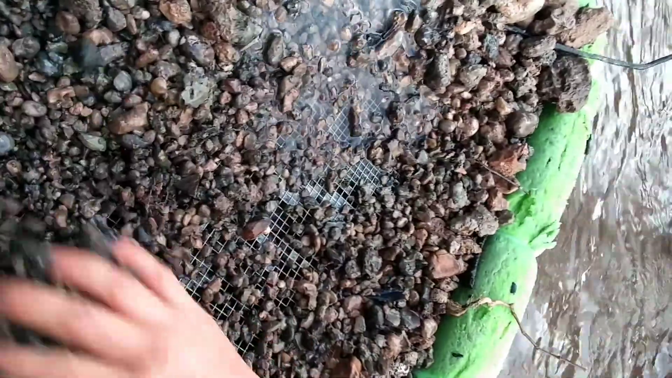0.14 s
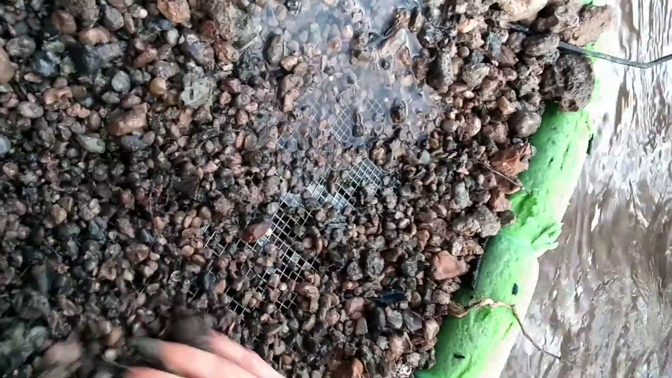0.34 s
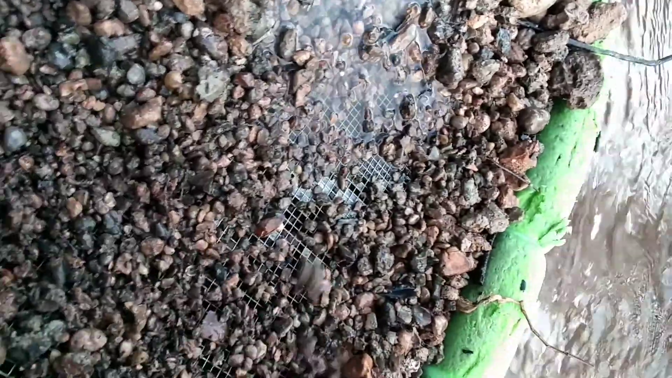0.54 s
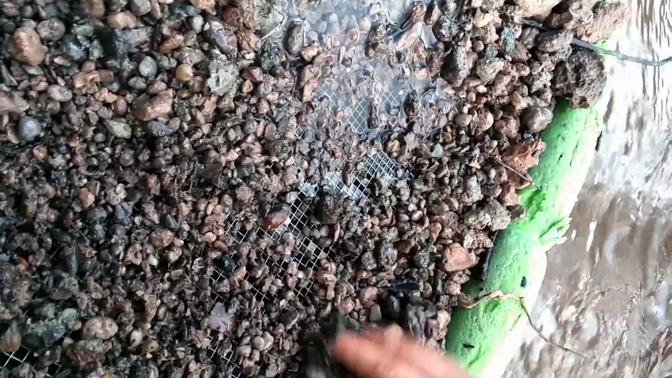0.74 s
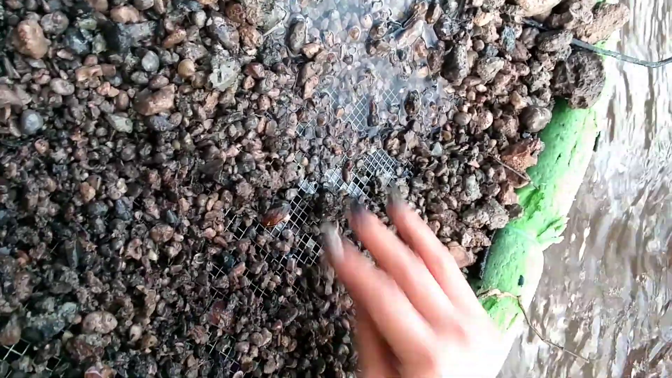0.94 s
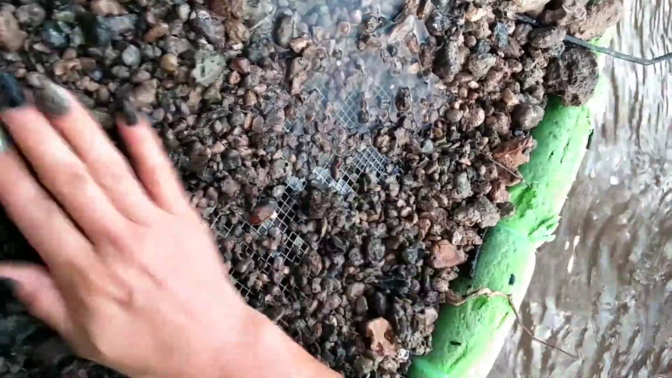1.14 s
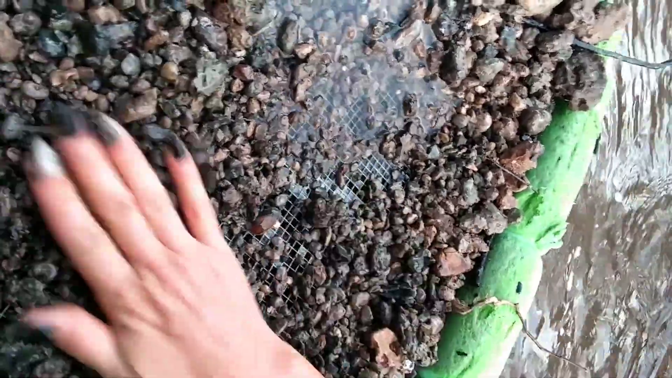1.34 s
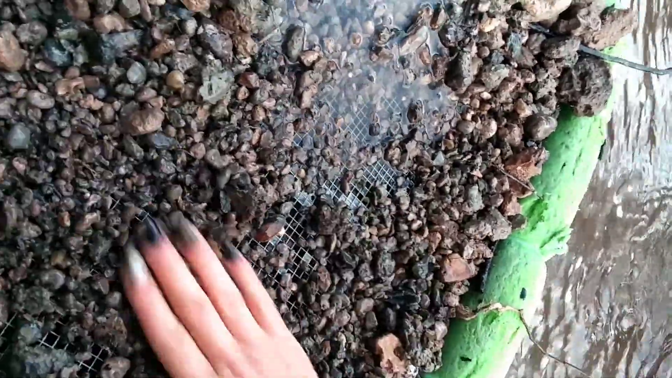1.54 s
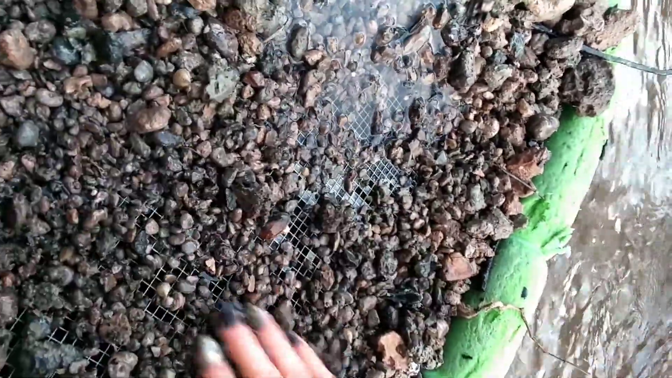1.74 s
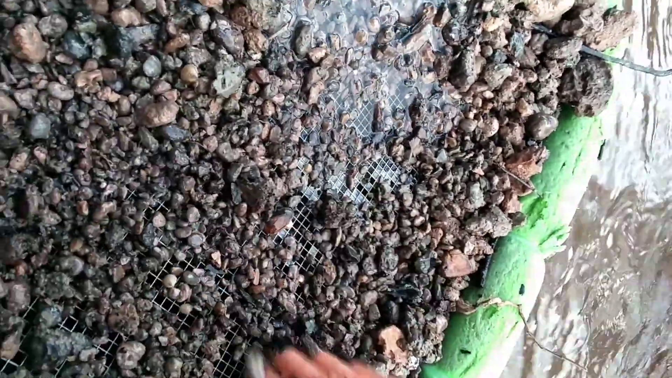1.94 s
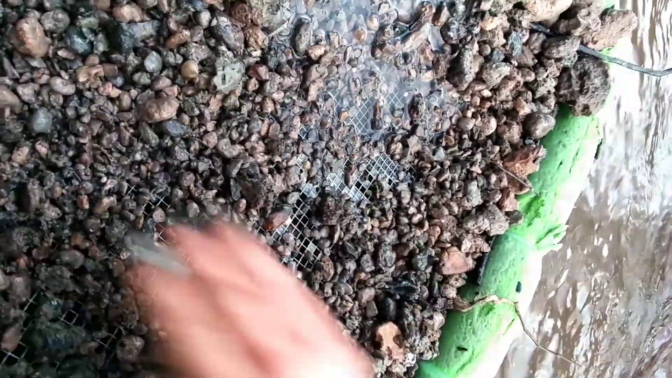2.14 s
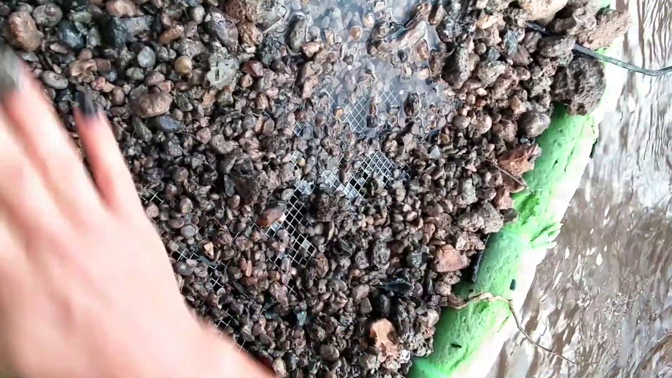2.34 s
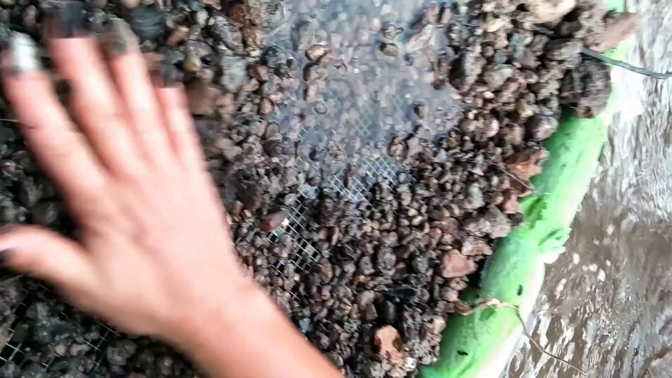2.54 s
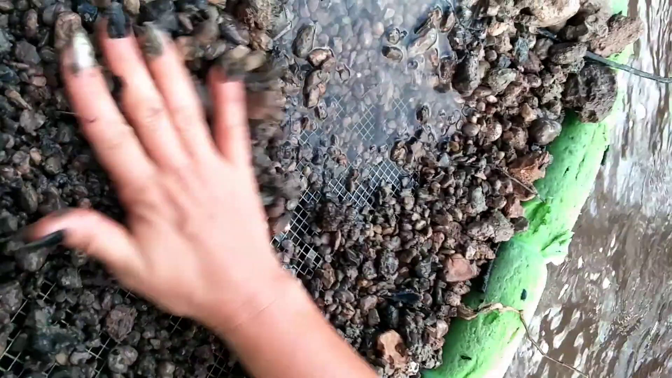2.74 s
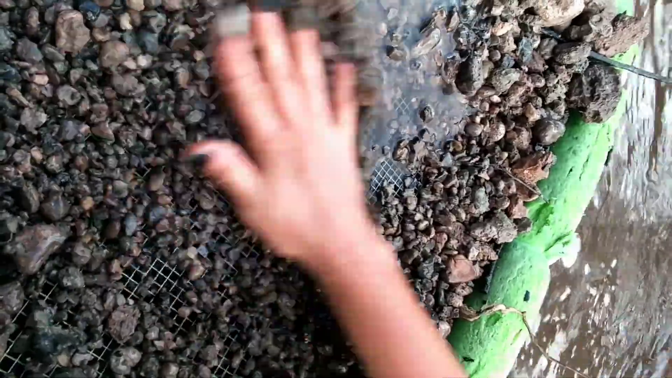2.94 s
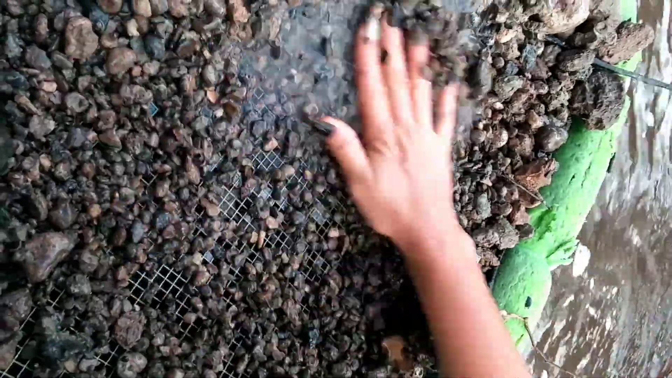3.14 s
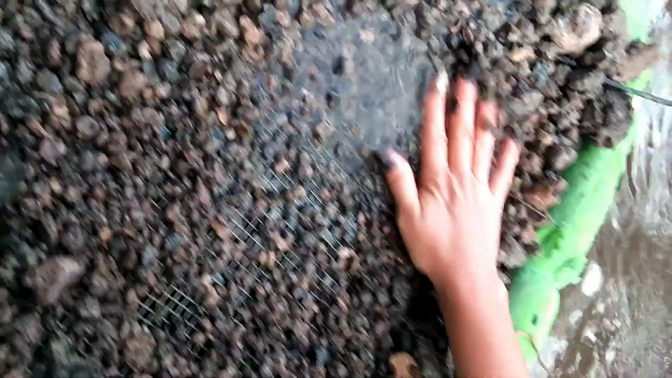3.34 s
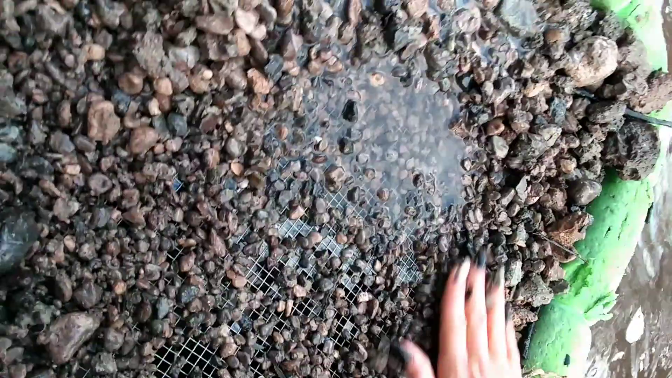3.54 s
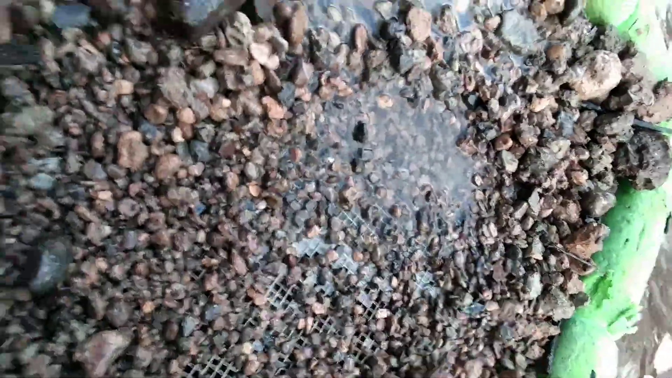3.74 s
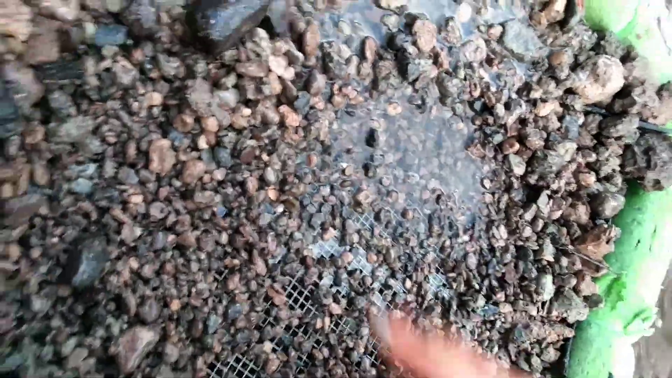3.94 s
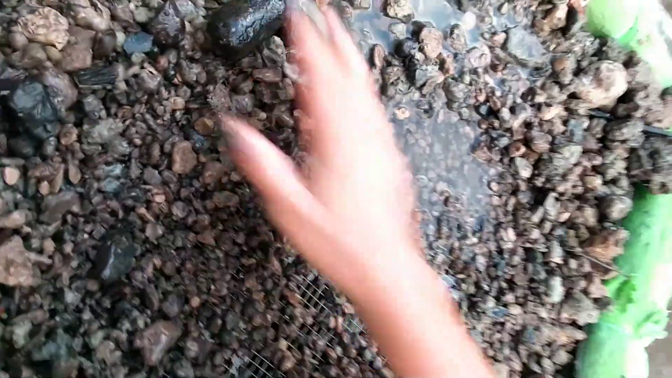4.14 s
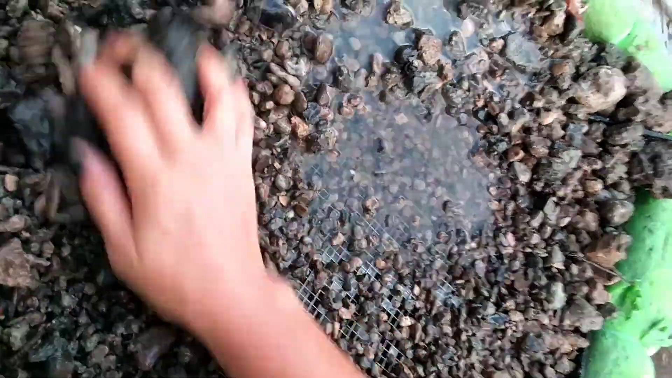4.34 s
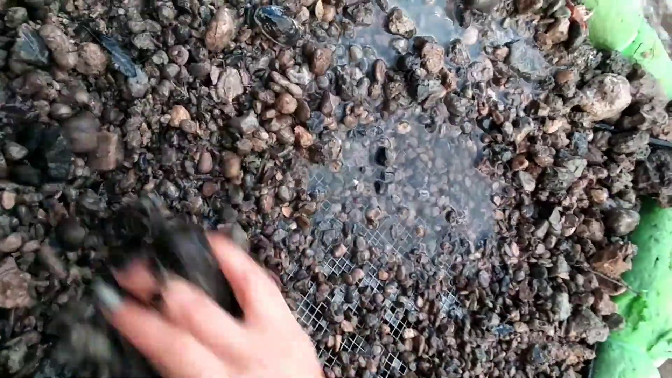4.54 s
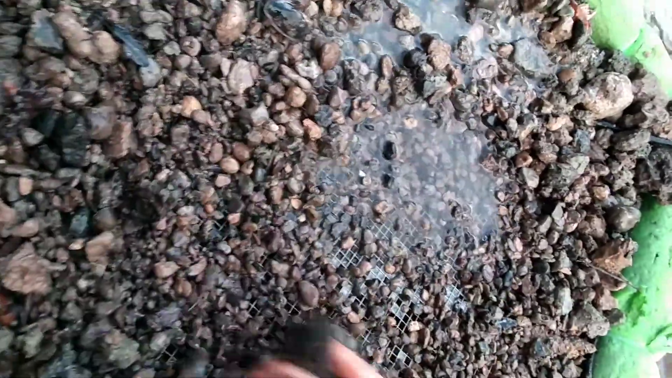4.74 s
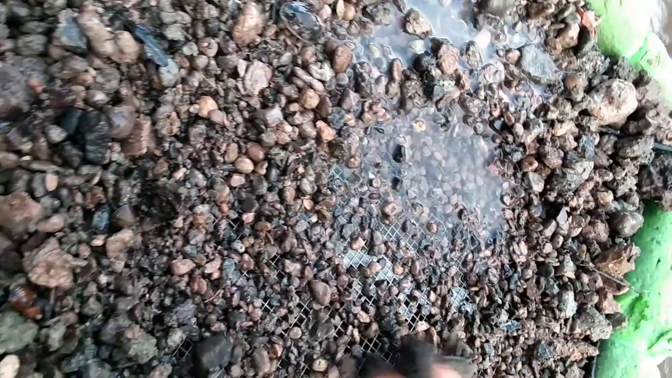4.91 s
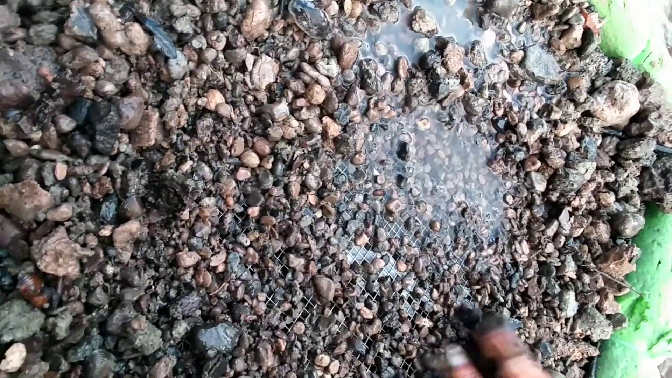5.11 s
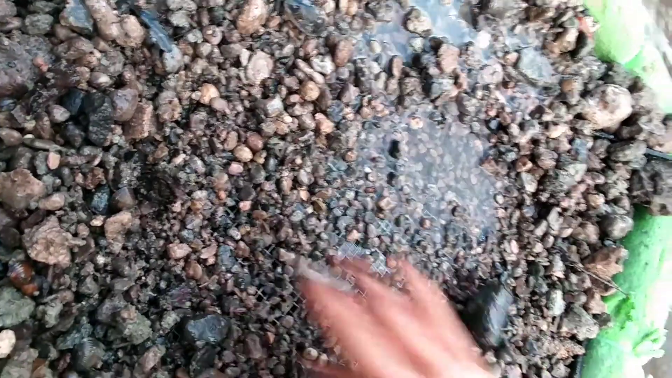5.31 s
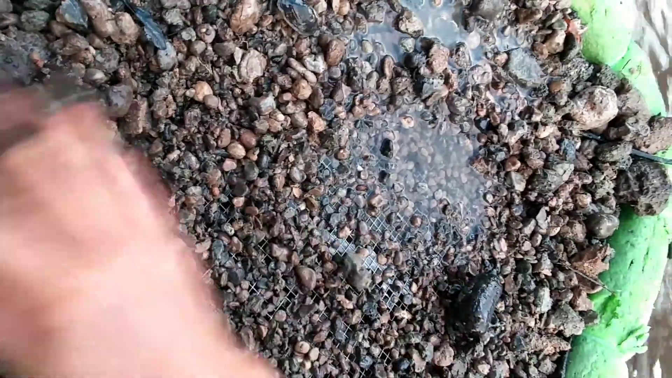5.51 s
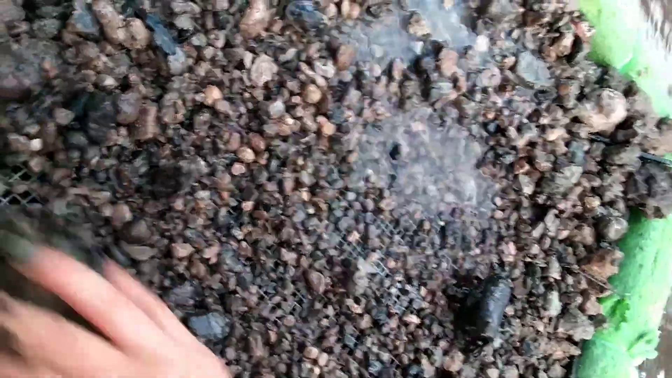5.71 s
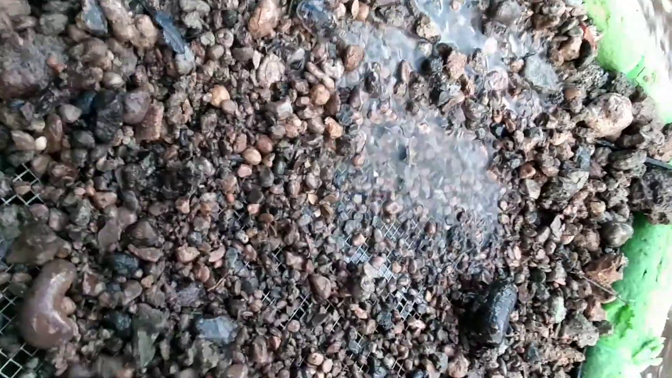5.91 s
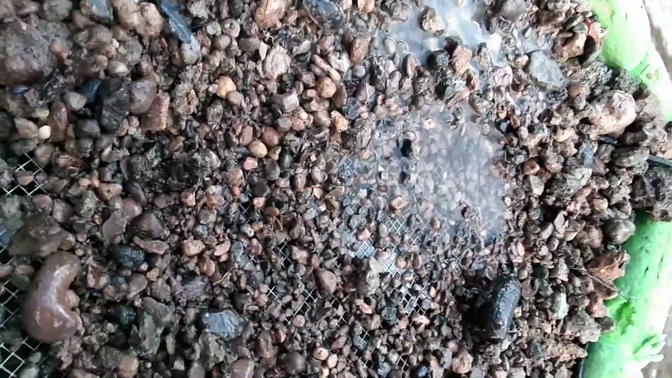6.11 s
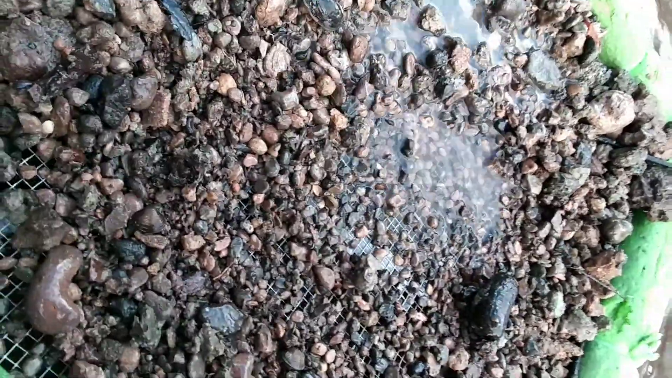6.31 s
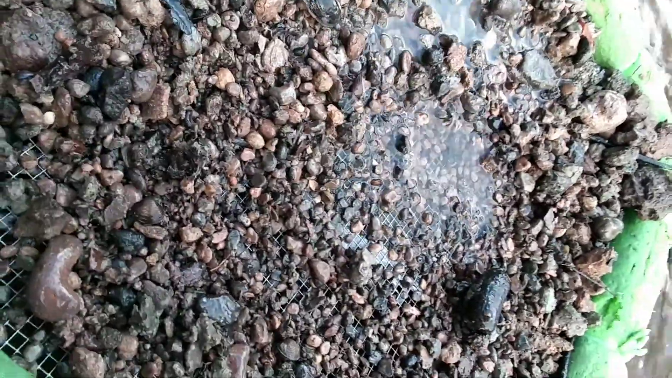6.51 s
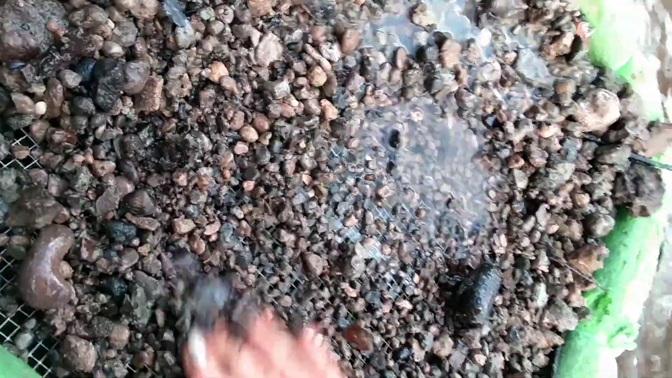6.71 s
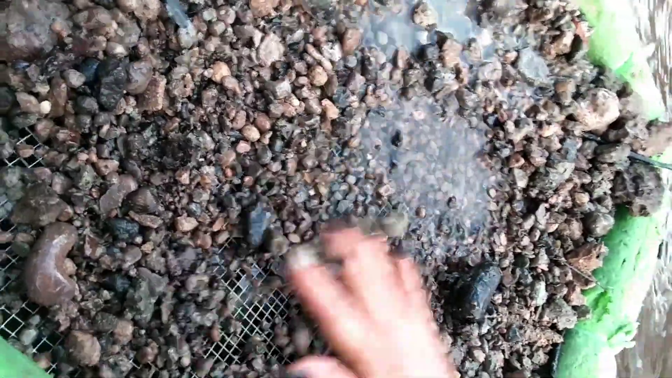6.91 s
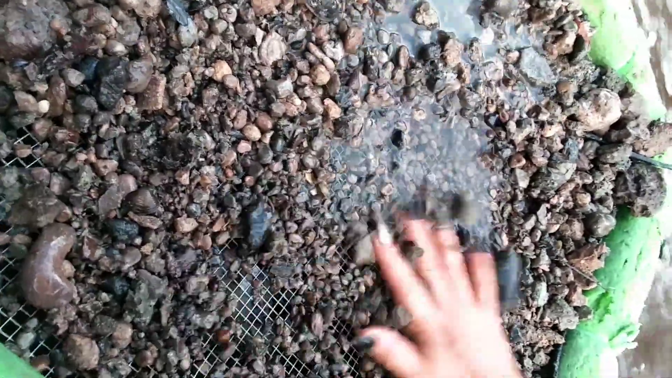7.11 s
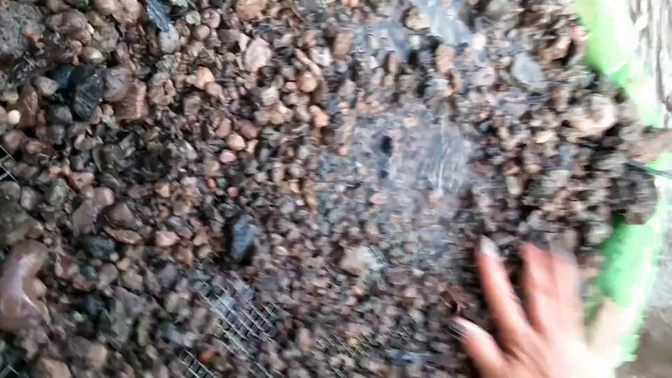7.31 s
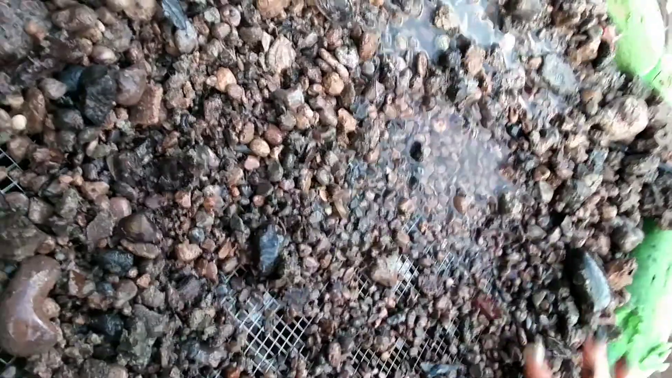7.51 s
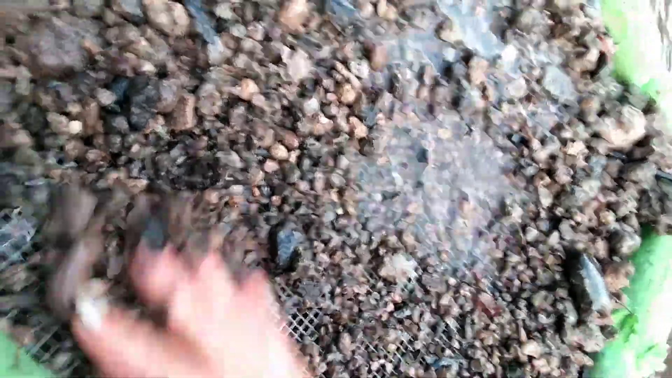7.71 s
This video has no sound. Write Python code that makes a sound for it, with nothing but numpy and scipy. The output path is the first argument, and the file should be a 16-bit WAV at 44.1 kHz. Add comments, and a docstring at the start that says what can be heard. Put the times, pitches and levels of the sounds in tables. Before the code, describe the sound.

A hand rakes wet gravel across a wire-mesh screen in short scraping strokes, with pebble clicks, stone knocks and faint lapping water behind.

```python
"""A hand rakes wet gravel over a wire-mesh screen in short strokes, close to a small stereo microphone.
The gravel is showers of damped rings and bursts of noise, driven by the push of the hand in jolts.
Skidding stones are swells of narrow noise, clicking pebbles are noise cracks, and heavy stones knock
the screen with a decaying tone and a thud. Behind it, filtered noise laps and trickles faintly as water,
and two wavering sines make the low hum of a far motor, with low booming at the start and end."""
import sys
import numpy as np
from scipy import signal
from scipy.fft import rfft, irfft, next_fast_len
from scipy.io import wavfile
from scipy.ndimage import uniform_filter1d, map_coordinates

SR = 44100
rng = np.random.default_rng(int(sys.argv[2]) if len(sys.argv) > 2 else 0)


def unload_wav(signal):
    """Save mono or channel-first audio to the path in sys.argv[1] as 16-bit WAV at rate SR, clipped to [-1, 1]."""
    wavfile.write(
        sys.argv[1],
        SR,
        np.round(np.clip(np.atleast_2d(signal).T, -1, 1) * 32767).astype(np.int16),
    )


N = 342216
TIME = np.arange(N) / SR
TOP_HZ = 15950  # upper band limit


def amp(db):
    """Decibels to gain."""
    return 10 ** (np.asarray(db) / 20)


def unit(x):
    """Scale to rms 1."""
    return x / np.sqrt(np.mean(x ** 2) + 1e-20)


def curves(rows):
    """One value per sample for each column after the time."""
    s, *cols = np.transpose(rows)
    return [np.interp(TIME, s, c) for c in cols]


def wobble(rate):
    """A smooth random curve, rate knots a second."""
    knots = rng.standard_normal(int(N * rate / SR) + 4)
    return map_coordinates(knots, [TIME * rate])


def colour(x, points, power=1):
    """Causal minimum-phase filter through (Hz, dB) points on a log axis; power scales the dB."""
    m = 2 * next_fast_len(N // 2 + 8192)
    hz, db = np.transpose(points)
    log_hz = np.log(np.fft.rfftfreq(m, 1 / SR) + 1)
    log_gain = np.log(amp(np.interp(log_hz, np.log(hz), db)))
    cepstrum = irfft(power * log_gain, m)
    # fold the cepstrum forward in time
    cepstrum[1:m // 2] *= 2
    cepstrum[m // 2 + 1:] = 0
    return irfft(rfft(x, m) * np.exp(rfft(cepstrum)), m)[..., :N]


def add(track, s, sound):
    """Mix a stereo sound into the track at time s."""
    part = track[:, max(round(s * SR), 0):][:, :sound.shape[1]]
    part += sound[:, :part.shape[1]]


def noise_band(low_hz, high_hz, shape):
    """White noise through a gentle band-pass."""
    b, a = signal.butter(2, [low_hz, high_hz], "band", fs=SR)
    return signal.lfilter(b, a, rng.standard_normal(shape))


# Tone of each gravel layer, and of the loaded mesh as a drumhead (boom).
# Each row: frequency in Hz, relative level in dB.
SAND_TONE = [(3000, -16.5), (7000, -3.5), (11000, 4), (16000, 6)]
GRIT_TONE = [(1200, -45.5), (3000, -9.5), (4800, -2), (8000, -0.5), (11000, -4.5), (16000, -8)]
PEBBLE_TONE = [(900, -31), (1800, -10.5), (2700, -4.5), (4200, -2), (6000, 3), (10000, -32)]
STONE_TONE = [(400, -32.5), (800, -7.5), (1150, 0), (1500, -1), (1900, -1), (2800, -13), (5000, -33)]
SCREEN_TONE = [(40, -26), (90, -0.5), (160, -2), (300, -6), (620, 2), (850, 1), (1400, -1), (3000, -41)]
BOOM_TONE = [(30, -25.5), (55, -13), (82, 3.5), (110, -10.5), (170, -10), (300, -29.5)]
UNEVEN_DB, UNEVEN_RATE = 1.0, 28  # unevenness of the drag: depth, changes per s
SNAP_RATE, SNAP_LIFE_S, SNAP_SCATTER_DB = 45, .00028, 3.5  # snaps per s at busy = 1, decay, spread of level


def raking():
    """The harder the push, the more stones move at once; small ones ring high, big ones low, and the
    screen rumbles."""
    push, on_sand, on_pebbles, on_stones, on_screen = effort()
    busy = np.clip(push / amp(-24), .03, 3) ** .6

    # a full push slides smoothly; a dying one breaks up into separate ticks
    slip = jolts(190 * np.sqrt(busy), life=0.004, scatter_db=0.8, smooth=1.1 * np.sqrt(busy))

    # sand scratches along the wires in tiny bursts
    scratch = jolts(900 * busy, life=0.00064, scatter_db=2.0, smooth=.5)
    sand = on_sand * unit(colour(scratch * rng.standard_normal((2, N)), SAND_TONE))

    grit = impacts(8000 * busy, hz=6640, spread=.35, cycles=1.7, scatter_db=0.0, width_s=.00008, size=96)
    grit = push * amp(-1.5) * patchy(colour(grit, GRIT_TONE), depth_db=2.0)

    pebbles = impacts(3500 * busy, hz=3122, spread=.35, cycles=4.5, scatter_db=0.0, width_s=.00006, size=256)
    pebbles = on_pebbles * patchy(colour(pebbles, PEBBLE_TONE), depth_db=2.5)

    stones = impacts(1600 * busy, hz=1343, spread=.35, cycles=3.7, scatter_db=1.5, width_s=.00009, size=500)
    stones = on_stones * patchy(colour(stones, STONE_TONE), depth_db=2.5)

    screen = impacts(1100 * busy, hz=580, spread=.6, cycles=2.0, scatter_db=2.5, width_s=.00009, size=600)
    screen = on_screen * unit(colour(screen, SCREEN_TONE))

    boom_level = amp(-52.5) * (on_screen / amp(-46.5)) ** 0.31
    boom = boom_level * unit(colour(rng.standard_normal(N), BOOM_TONE))

    # above busy = 1, a single snap grows more slowly than the push
    edges = push / np.maximum(busy, 1) * snaps(SNAP_RATE * busy ** .3, SNAP_LIFE_S, SNAP_SCATTER_DB)

    # the jolts cut deepest into the fine layers
    gravel = slip * (sand + grit) + slip ** 0.46 * (pebbles + stones) + slip ** 0.52 * screen + edges
    # the fingers catch and give way a little as they go
    gravel *= amp(UNEVEN_DB * wobble(UNEVEN_RATE))
    # where the sound reaches the left microphone first it also leans left
    reach = np.clip(curves(HAND_PLACE)[0] / 0.00011, 0, 1)
    return gravel * amp(np.outer([1, -1], 1.2 * reach - .5)) + boom


# Strokes of the hand.
# Each row: start in s, attack in s, lift in s, release in s, push in dB, sag in dB per s, then levels
# in dB relative to the push of sand, pebbles, big stones and screen.
HAND_STROKES = [(-0.08, 0.021, .47, 0.44, -16.5, 16, 3.5, -5.5, -14.5, -11),
                (1.213, .07, 1.599, 0.32, -21, 14, 2, -10.5, -21, -17),
                (2.185, .025, 2.656, .45, -25.5, -8, 4.5, -2, -11, -23),
                (2.68, 0.099, 3.227, 0.43, -26.5, 0, -5, 3.5, -9.5, -22),
                (3.29, .04, 3.535, .37, -25.5, 5, 4, -7.5, -17.5, -18),
                (4.15, 0.089, 4.99, 0.29, -13, 19.5, 3.5, -8, -24, -25),
                (5.462, .07, 6.03, .27, -19, 13, 1, -2.5, -10.5, -9),
                (6.483, 0.031, 6.837, .2, -20.5, 1, 2.5, -8.5, -20, -20.5),
                (7.603, 0.042, 7.73, .3, -18.5, -0.5, 4, -3.5, -13, -15.5)]
# Heaps of coarse gravel that build before the fingers and tumble.
# Each row: crest in s, rise in s, fall in s, push in dB, then levels in dB relative to the push of sand,
# pebbles, big stones and screen.
GRAVEL_HEAPS = [(.32, 0.064, 0.083, -30, -13, 0, -5.5, -3), (1.5, 0.057, 0.048, -36, -10, -1, -5.5, -3.5),
                (2.55, .055, .17, -16, -7.5, 3, -17, -35.5), (2.76, .06, 0.042, -22, -10.5, -6, -8, -21.5),
                (2.875, .025, 0.058, -21.5, -12, -3, -7.5, -22),
                (3.11, .012, 0.029, -28, -18, -18, -19.5, -36),
                (3.235, .018, 0.093, -24.5, -13, 0.5, -11, -23),
                (3.54, .07, 0.059, -28.5, -5.5, -3.5, -3.5, -11),
                (4.22, .035, .08, -17.5, -10.5, -0.5, -9.5, -33.5),
                (4.45, .03, 0.058, -22, 3.5, -2, -26, -32), (5.487, .012, .015, -29, -8.5, 0.5, -2, -11.5),
                (5.67, .03, .03, -26, 2, -12.5, -32.5, -31), (5.88, .12, .13, -33, -4, -5, -12, -3.5),
                (6.54, .02, 0.067, -29, 2.5, -0.5, -11, -14), (6.76, 0.017, 0.027, -23, 2, 0, -17, -20),
                (6.96, .075, 0.067, -19, -10, -3, -13.5, -23.5)]
# Light touches or small slides of loose stones. Each row: start in s, length in s, push in dB.
LIGHT_TOUCHES = [(0.714, 0.038, -39), (.84, 0.034, -43), (1.053, .04, -33), (1.15, 0.064, -47.5),
                 (1.868, .035, -54), (2.104, 0.059, -37), (3.67, 0.038, -35), (3.774, 0.037, -43),
                 (3.87, .035, -52), (4.133, .04, -34), (5.25, 0.072, -50), (5.334, .025, -50.5),
                 (6.255, 0.044, -47), (7.04, .075, -32), (7.129, 0.047, -32), (7.203, .04, -48),
                 (7.57, .03, -54)]
# Balance of a touch, one row: grit, sand, pebbles, big stones and screen, in dB relative to its push.
TOUCH_BALANCE = [0, -1, -12, -26.5, -24]
# Change with shallow fingers, one row: grit, sand, pebbles, big stones and screen,
# in dB per unit of shallowness.
SHALLOW_BALANCE = [0, -3.5, -4, -8, -10.5]
DIG_S = 0.28  # time constant of the fingers sinking through the fine top layer
RELEASE_DB = 40  # lost over the release, slowly at first, as the fingers leave
RUN_ON_DB, RUN_ON_S = -14.5, .075  # loose grains trickle on as the fingers leave: level under the push, decay
TOUCH_ATTACK_S, TOUCH_FADE_S = .012, .018


def effort():
    """Strokes, heaps and touches add in power: the strength of grit, sand, pebbles, big stones and screen."""
    power = np.full((5, N), 1e-12)

    for start, attack, lift, release, db, sag, *mix_db in HAND_STROKES:
        age = np.maximum(TIME - start, 0)
        leaving = np.maximum(TIME - lift, 0) / release  # 0 to 1 over the release
        fading = amp(-RELEASE_DB * leaving ** 2)
        run_on = amp(RUN_ON_DB) * np.exp(-leaving * release / RUN_ON_S) * (leaving < 1)
        push = (1 - np.exp(-age / attack)) * amp(db - sag * age) * np.maximum(fading, run_on)
        on = push > 1e-6
        shallow_db = np.outer(SHALLOW_BALANCE, np.exp(-age[on] / DIG_S) + leaving[on])
        layer_db = np.array([0, *mix_db])[:, None] + shallow_db
        power[:, on] += (push[on] * amp(layer_db)) ** 2

    for crest, rise, fall, db, *mix_db in GRAVEL_HEAPS:
        away = (TIME - crest) / np.where(TIME < crest, rise, fall)
        on = abs(away) < 5
        push = amp(db) * np.exp(-.5 * away[on] ** 2)
        power[:, on] += np.outer(amp([0, *mix_db]), push) ** 2

    for s, length, db in LIGHT_TOUCHES:
        age = np.clip(TIME - s, 0, 1)
        fade = np.exp(-np.maximum(age - length, 0) / TOUCH_FADE_S)
        push = amp(db) * (1 - np.exp(-age / TOUCH_ATTACK_S)) * fade
        power += np.outer(amp(TOUCH_BALANCE), push) ** 2
    return np.sqrt(power)


def jolts(rate, life, scatter_db, smooth):
    """Stick and slip: each slip starts at once and dies within milliseconds, over a share of smooth sliding."""
    starts = rng.random(N) < rate / SR
    strength = amp(scatter_db * np.clip(rng.standard_normal(N), -2, 2)) ** 2
    power = signal.lfilter([1], [1, -np.exp(-1 / (life * SR))], starts * strength / rate)
    power = power / power.mean() + smooth
    # level out the slow changes, keep the jolts
    return np.sqrt(power / uniform_filter1d(power, size=2600))


# The strokes sweep across the screen. Each row: time in s, lead of the left microphone in s.
HAND_PLACE = [(0, -.00016), (.9, .00008), (1.2, -.00007), (1.9, 0), (2.2, -.00007), (3.05, .00023),
              (3.8, .00007), (4.2, -.00009), (5.1, .00014), (5.46, -.0002), (6.1, 0), (6.5, .00002),
              (7.1, .00022), (7.6, -.00018)]


def impacts(rate, hz, spread, cycles, scatter_db, width_s, size):
    """A shower of damped rings at rate a second; each comes from its own spot around the hand."""
    at = np.flatnonzero(rng.random(N) < rate / SR)
    pitch, weight, side, phase, spot = rng.standard_normal((len(at), 5)).T[:, :, None]
    f = np.clip(hz * np.exp(spread * pitch), 60, TOP_HZ)
    turns = f * np.arange(size) / SR
    level = amp(scatter_db * np.minimum(weight, 2)) * np.sqrt(f / rate[at, None])
    ring = level * np.exp(-turns / cycles)
    lag = f * (curves(HAND_PLACE)[0][at, None] + width_s * spot)  # in turns between the ears
    where = (at[:, None] + np.arange(size)).ravel()
    ears = []
    for ear in (1, -1):
        sound = ring * amp(ear * 2 * side) * np.sin(2 * np.pi * (turns + phase + ear * lag / 2))
        ears.append(np.bincount(where, sound.ravel(), N + size)[:N])
    return unit(np.array(ears))


def patchy(x, depth_db):
    """Stones under the fingers keep changing; each favours its own pitches for a few hundredths of a second."""
    z = signal.stft(x, nperseg=256)[2]
    field = rng.standard_normal(z.shape[1:])
    field = uniform_filter1d(field, size=3, axis=0)  # across pitch
    field = uniform_filter1d(field, size=12, axis=1)  # across time
    return unit(signal.istft(z * amp(depth_db * unit(field)), nperseg=256)[1][:, :N])


# Tone of the snapping edges. Each row: frequency in Hz, gain in dB.
SNAP_TONE = [(1000, -12), (4000, 5.5), (9000, 10), (12000, 15.5), (16000, 14.5)]


def snaps(rate, life, scatter_db):
    """Sharp edges flick past each other: sparse, very short cracks."""
    flicks = (rng.random(N) < rate / SR) * amp(scatter_db * np.clip(rng.standard_normal(N), -2, 2))
    decay = signal.lfilter([1], [1, -np.exp(-1 / (life * SR))], flicks)
    return colour(decay * rng.standard_normal((2, N)), SNAP_TONE)


# Stones skidding along a wire. Each row: start in s, level in dB before the common trim, pitch in Hz.
STONE_SKIDS = [(2.5419, -7.5, 2621), (2.5773, -1, 2760), (2.7049, -2, 3170), (2.7667, -7.5, 3077),
               (2.8476, -11, 1480), (3.0217, -6, 5356), (3.252, -12, 4970), (6.925, -4.5, 4919),
               (7.0022, -9, 4980), (7.0516, -21, 3500)]


def skids(gain_db=-12, length=0.009, width=0.059):
    """A skid is a short swell of narrow noise at the stone's own pitch."""
    out, t = np.zeros((2, N)), np.arange(SR // 12) / SR
    swell = (t / length) ** 2 * np.exp(2 - 2 * t / length)  # peaks at length, in s
    for s, db, hz in STONE_SKIDS:
        ring = noise_band(hz * np.exp(-width), hz * np.exp(width), (2, len(t)))
        add(out, s, amp(db + gain_db) * swell * unit(ring))
    return out


# Single pebbles clicking together. Each row: start in s, strike in dB before hardness and tone.
PEBBLE_CLICKS = [(0.8222, -28), (0.845, -22), (1.9046, -37), (2.1954, -22), (2.2123, -8), (3.0214, -9.5),
                 (3.118, -8.5), (3.347, -6.5), (3.7435, -20), (3.7837, -23), (3.8003, -19.5), (4.0364, -11),
                 (4.0447, -14.5), (4.7571, -12), (4.9662, -13), (5.2856, -21.5), (5.3532, -21.5),
                 (5.7608, -10), (5.889, -4.5), (6.2619, -26.5), (6.482, -15.5), (7.0868, -15.5),
                 (7.1394, -12.5), (7.1514, -29), (7.1808, -23), (7.2406, -19), (7.305, -32), (7.6118, -16)]
# Tone of the clicks. Each row: frequency in Hz, gain in dB.
CLICK_TONE = [(200, -12), (1200, -22.5), (3000, -9.5), (5000, 0), (8000, 4), (16000, -10.5)]
CLICK_ATTACK_S = 0.00084  # of the softest click; harder ones are quicker
SOFT_CLICK_DB, HARD_CLICK_DB = -16.5, -9  # from a gentle tap to a direct hit


def clicks(soft_t60=.016, hard_t60=0.0057, hard_gain_db=6, chatter_t60=0.069, chatter_db=-18):
    """A pebble cracks against its neighbour and chatters to rest; the harder the hit, the shorter the crack."""
    out, t = np.zeros((2, N)), np.arange(SR // 20) / SR
    for s, db in PEBBLE_CLICKS:
        hard = np.clip((db - SOFT_CLICK_DB) / (HARD_CLICK_DB - SOFT_CLICK_DB), 0, 1)
        t60 = soft_t60 * (hard_t60 / soft_t60) ** hard
        crack, chatter = rng.standard_normal((2, 2, len(t)))
        crack *= amp(hard * hard_gain_db - 60 * t / t60)
        chatter = signal.lfilter([.5, .5], 1, chatter) * amp(chatter_db - 60 * t / chatter_t60)
        attack = 1 - np.exp(-t / (CLICK_ATTACK_S * t60 / soft_t60))
        add(out, s, (crack + chatter) * amp(db) * attack)
    return colour(out, CLICK_TONE)


# Heavy stones landing on the screen.
# Each row: start in s, ring in dB, pitch in Hz, thud in dB; levels before the decay and the soft attack.
STONE_KNOCKS = [(0.622, -17, 1040, -31), (0.641, -24, 1220, -40), (1.823, -34, 898, -41),
                (4.299, -28, 999.5, -31), (4.648, -31, 1198, -32), (4.728, -32, 690, -29.5),
                (5.288, -49, 1560, -43.5), (5.477, -30, 1079, -31.5), (5.489, -18.5, 1036, -21.5),
                (6.523, -23, 719, -29.5)]


def knocks(t60=0.022, thud_t60=0.046):
    """A heavy stone gives a short hollow ring and a dull thud of the loaded mesh."""
    out, t = np.zeros((2, N)), np.arange(SR // 10) / SR
    attack = 1 - np.exp(-t / 0.0012)
    for s, ring_db, hz, thud_db in STONE_KNOCKS:
        ring = np.sin(2 * np.pi * hz * t) * amp(ring_db - 60 * t / t60)
        thud = unit(noise_band(70, 1000, len(t))) * amp(thud_db - 60 * t / thud_t60)
        add(out, s, np.tile((ring + thud) * attack, (2, 1)))
    return out


def scatter(x, wet_db=-16):
    """The stone bed and the frame throw back a brief diffuse echo."""
    t = np.arange(SR // 6) / SR
    tail = rng.standard_normal((2, len(t))) * amp(-60 * t / .075) * (t > .001)
    tail /= np.linalg.norm(tail[0])
    return x + amp(wet_db) * signal.fftconvolve(x, tail, axes=1)[:, :N]


# Tone of the lapping water. Each row: frequency in Hz, relative level in dB.
WATER_TONE = [(20, -27.5), (45, -11), (65, 5.5), (110, 11), (170, 2.5), (240, 5), (350, -6), (620, -11),
              (1200, -21), (4000, -25), (16000, -31)]
# Fader of the trickle, before its flutter. Each row: time in s, level in dB.
TRICKLE_LEVEL = [(0, -80.5), (4, -79), (7.4, -85.5)]


def water():
    """Soft wash of filtered noise, and a trickle of sparse random drips."""
    wash = rng.standard_normal(N) + colour(rng.standard_normal((2, N)), [(200, -5.5), (900, 7.0)])
    wash = amp(-60 + 0.5 * wobble(6.8)) * unit(colour(wash, WATER_TONE))
    drips = (rng.random((2, N)) < 150 / SR) * rng.standard_normal((2, N)) ** 3
    drips = colour(drips, [(800, -20.5), (2500, 6.0), (5000, 3.5), (8000, -2.0), (16000, -6.0)])
    trickle = amp(curves(TRICKLE_LEVEL)[0] + 1.5 * wobble(12)) * unit(drips)
    return wash + trickle


# Levels of the low hum near 82 and 164 Hz, before its wavering, with low booming at the start and end.
# Each row: time in s, lower tone in dB, upper tone in dB.
HUM_LEVEL = [(0, -44, -38), (1, -58, -53.5), (1.6, -53, -47.5), (2, -55, -53.5), (3, -54, -49),
             (4.3, -58, -55), (4.7, -60.5, -67.5), (7.45, -66, -73.5), (7.7, -45, -53)]
HUM_HZ = 82.2  # centre pitch of the lower tone


def low_hum():
    """Two sines an octave apart waver together in pitch: a far motor's hum, and low booming at both ends."""
    lower_db, upper_db = curves(HUM_LEVEL)
    turn = 2 * np.pi * np.cumsum(HUM_HZ * (1 + 0.0098 * wobble(2.7))) / SR
    lower = amp(lower_db + 4 * wobble(10)) * np.sin(turn + wobble(11.0))
    upper = amp(upper_db + wobble(5)) * np.sin(2 * turn)
    return lower + upper


def scene():
    """Gravel on the screen, in the open air, with water and a low hum behind."""
    return scatter(raking() + skids() + clicks() + knocks()) + water() + low_hum()


# Overall tone: a peak near 7.8 kHz, a dip near 10.4 kHz. Each row: frequency in Hz, gain in dB.
OVERALL_TONE = [(5500, 0), (7000, 0), (7800, 9.5), (8400, 4), (9300, -5), (10400, -16.5), (12000, -9),
                (15000, -3.5)]
# Left channel over right, shared half each. Each row: frequency in Hz, difference in dB.
LEFT_OVER_RIGHT = [(100, 4.3), (500, 1.6), (1200, 2), (2500, 1), (5000, 2.8), (7800, 6.8), (10000, 9),
                   (15000, 4.8)]


def record(dry):
    """Overall tone, the left channel stronger; full-scale clipping and the band limit."""
    left, right = colour(dry, OVERALL_TONE)
    left = colour(left, LEFT_OVER_RIGHT, power=.5)
    right = colour(right, LEFT_OVER_RIGHT, power=-.5)
    x = np.clip([left, right], -1, 1)
    return signal.fftconvolve(x, signal.firwin(301, TOP_HZ, fs=SR)[None], "same", axes=1)


dry = scene()
out = record(dry)
unload_wav(out)
```